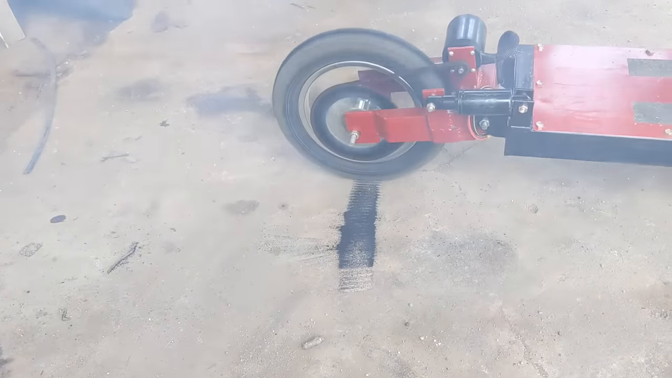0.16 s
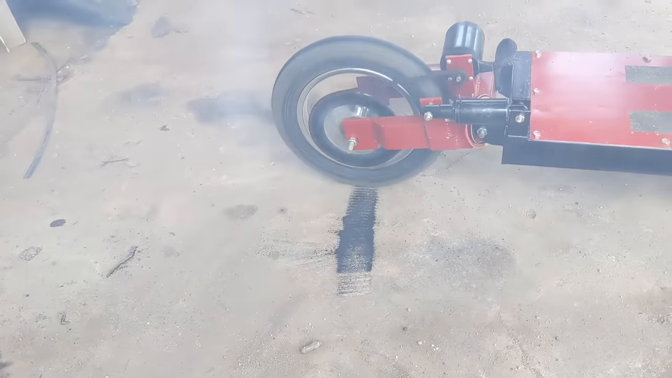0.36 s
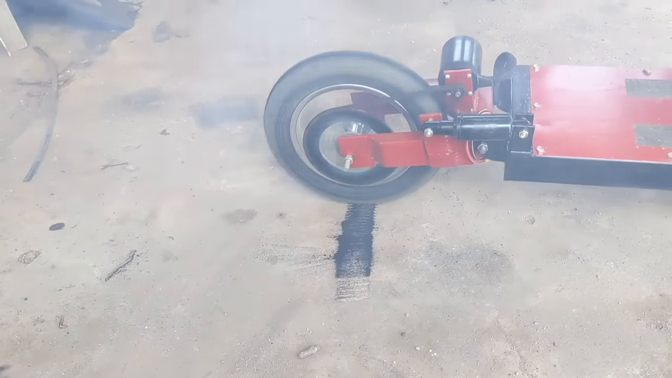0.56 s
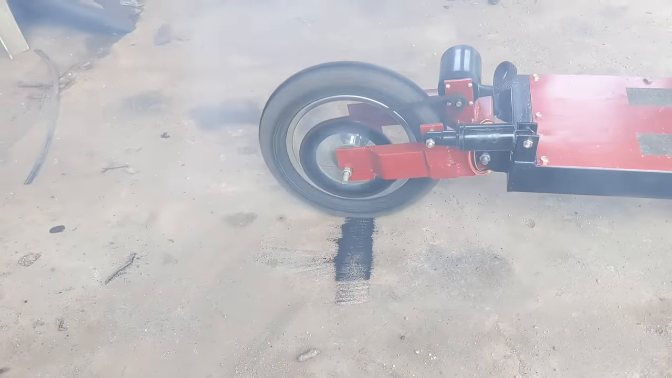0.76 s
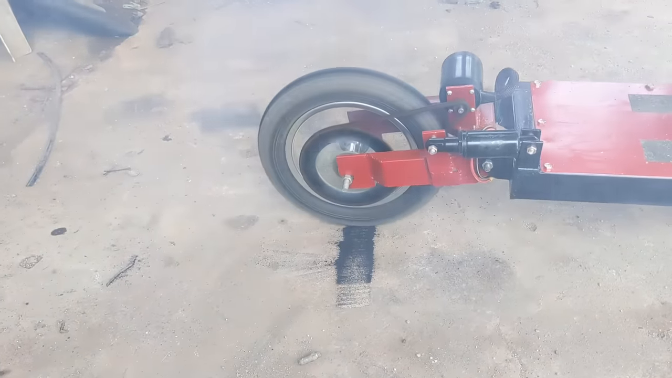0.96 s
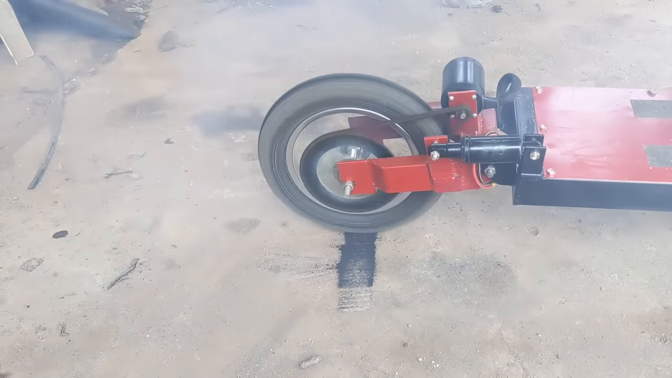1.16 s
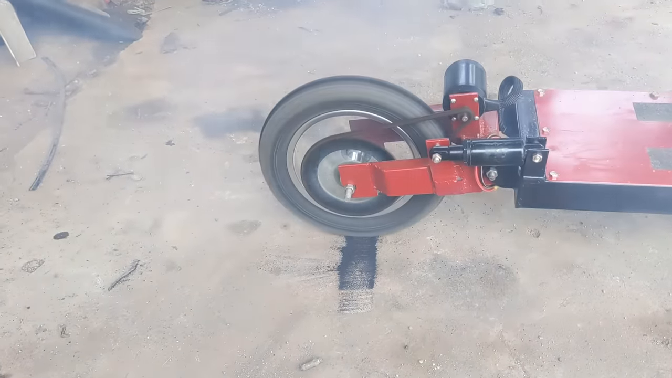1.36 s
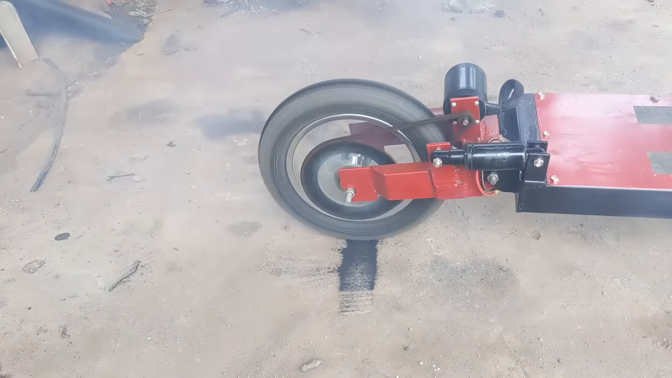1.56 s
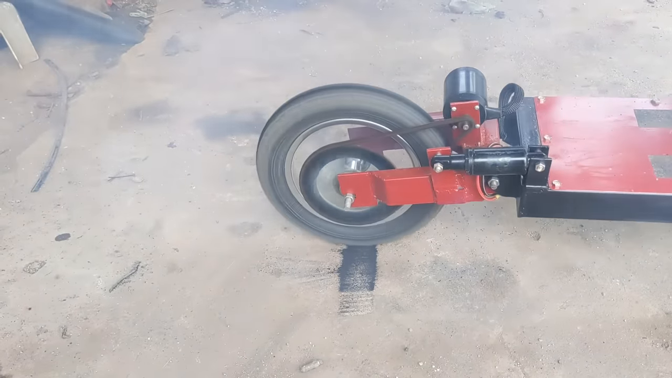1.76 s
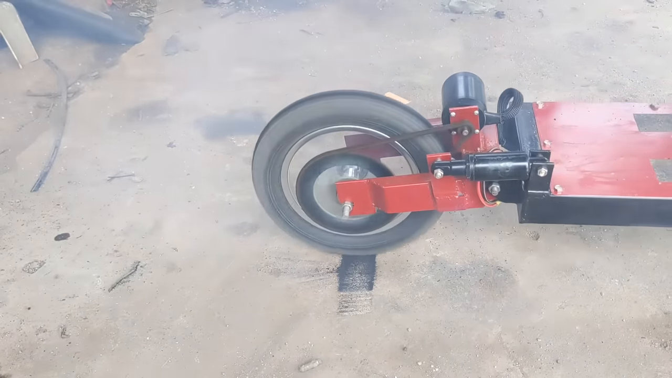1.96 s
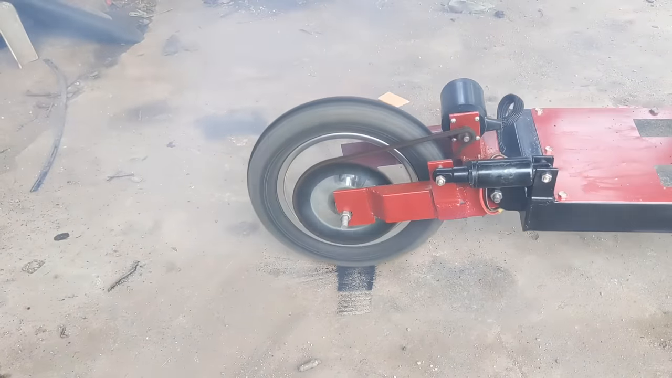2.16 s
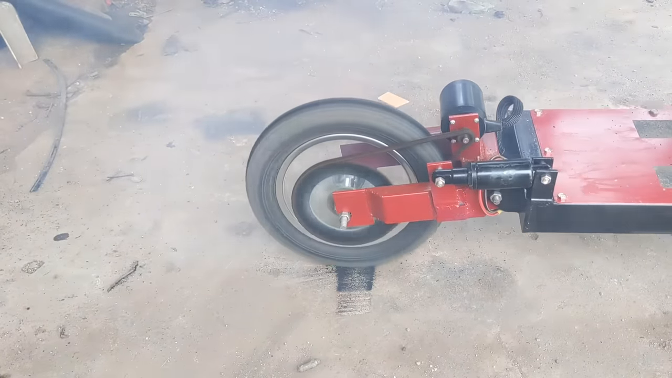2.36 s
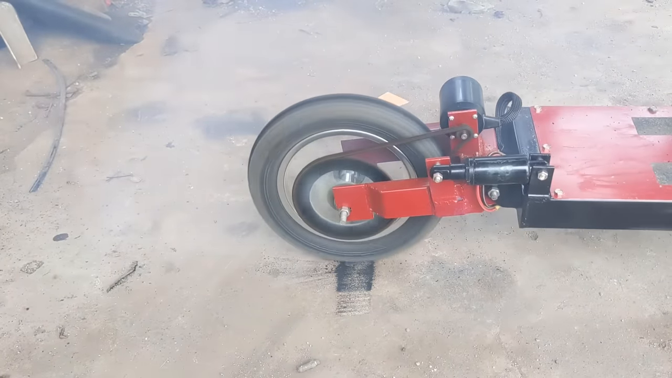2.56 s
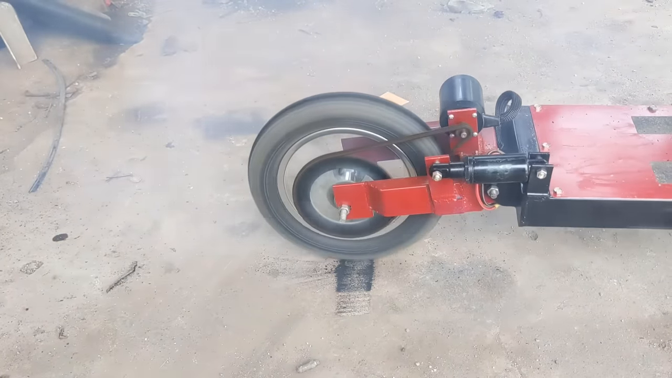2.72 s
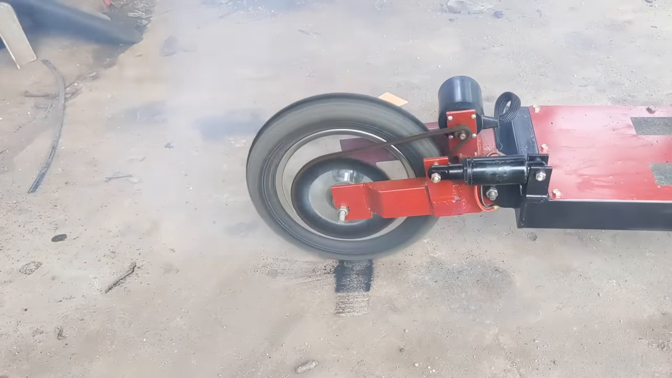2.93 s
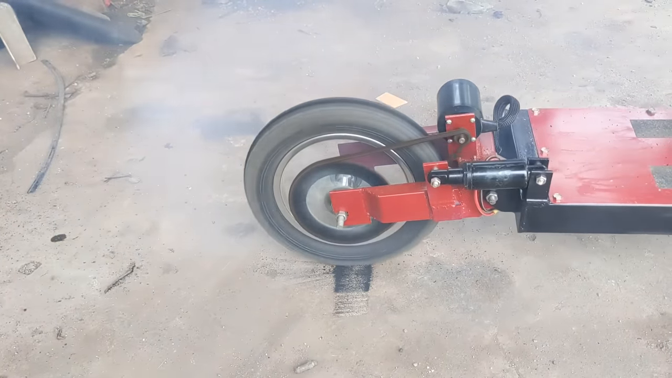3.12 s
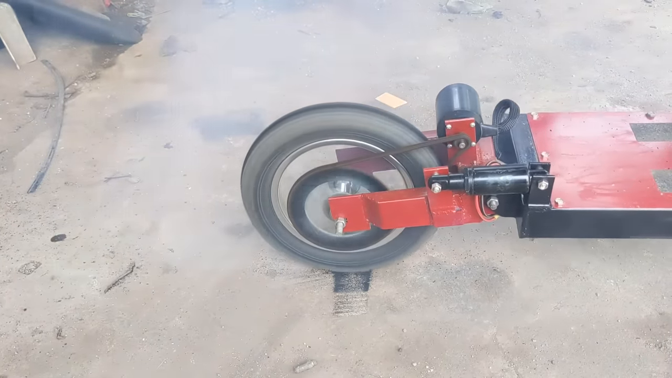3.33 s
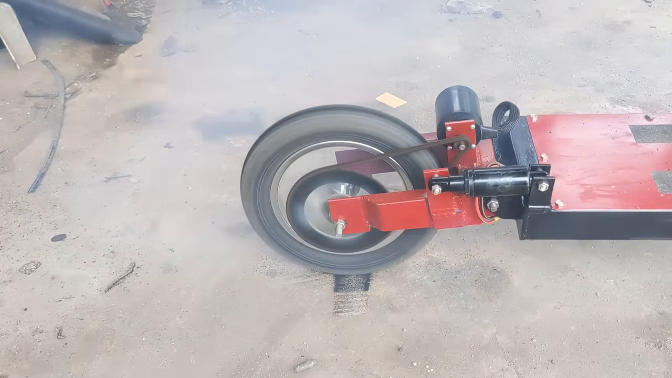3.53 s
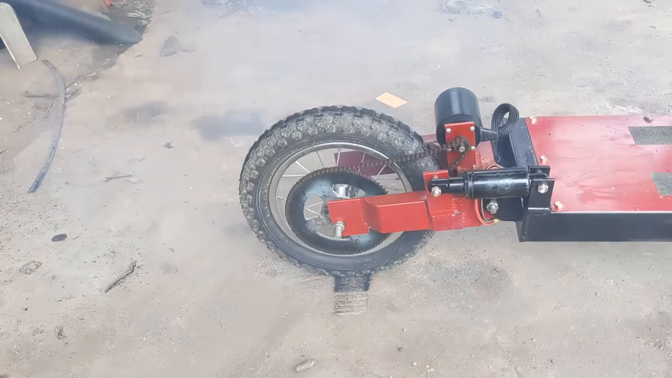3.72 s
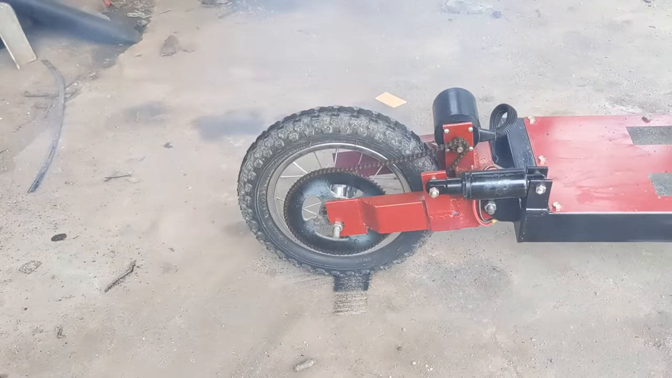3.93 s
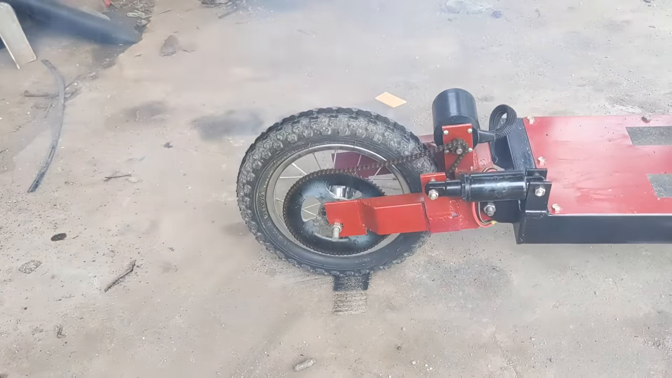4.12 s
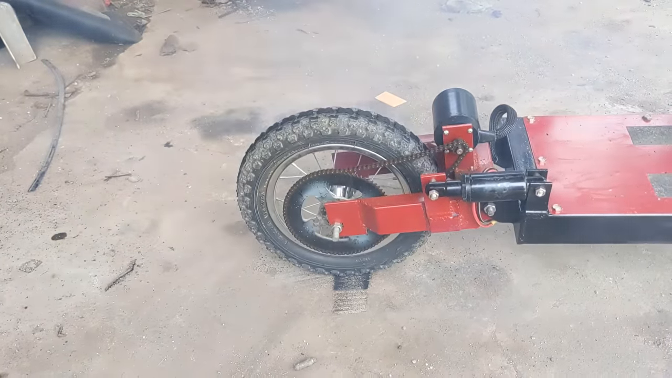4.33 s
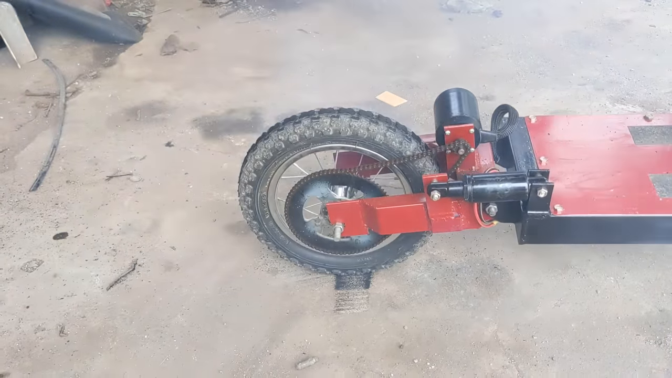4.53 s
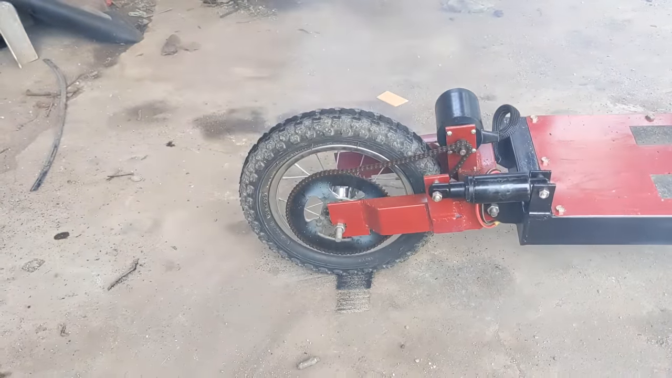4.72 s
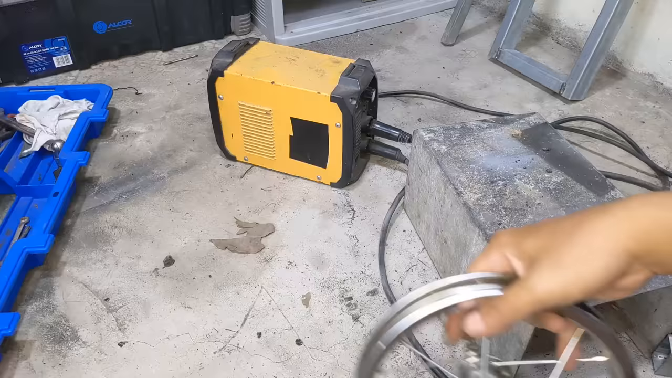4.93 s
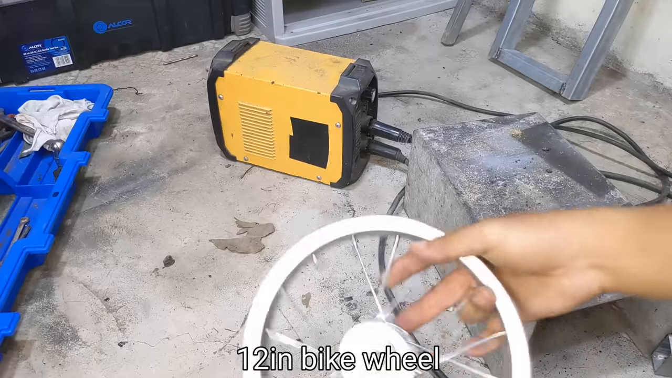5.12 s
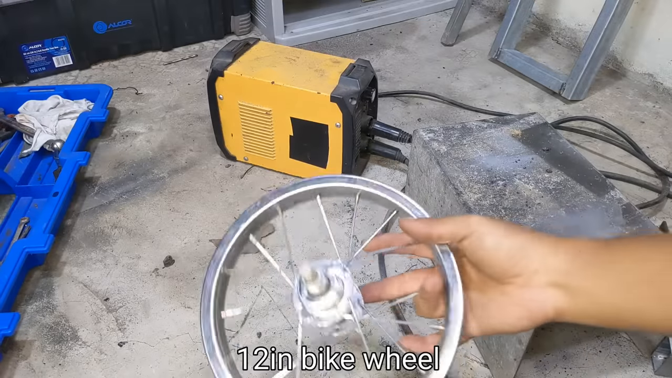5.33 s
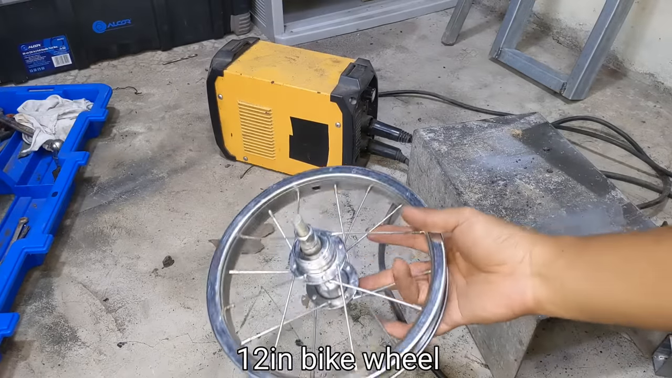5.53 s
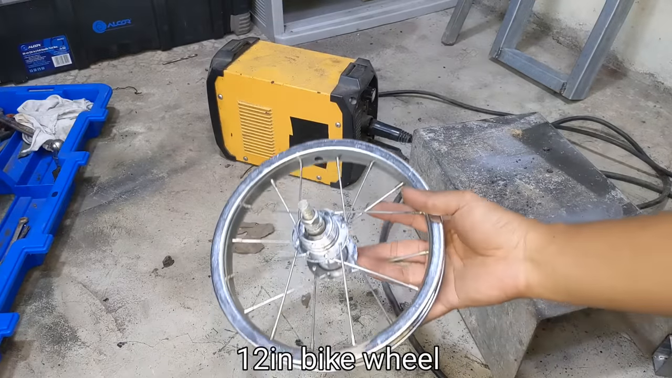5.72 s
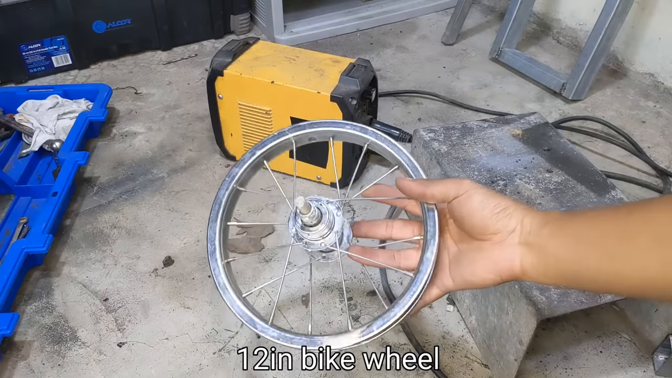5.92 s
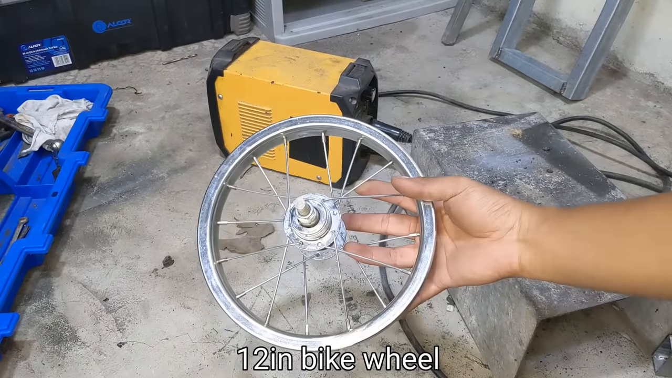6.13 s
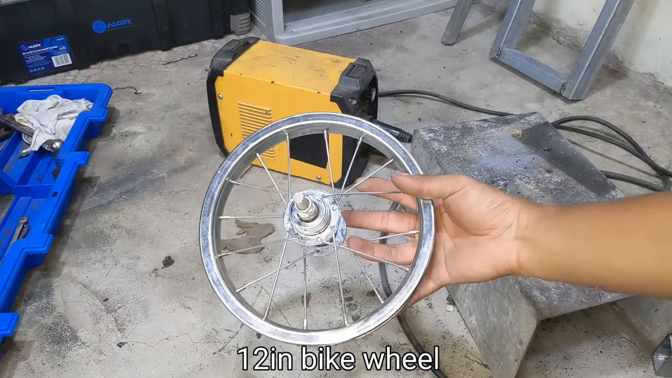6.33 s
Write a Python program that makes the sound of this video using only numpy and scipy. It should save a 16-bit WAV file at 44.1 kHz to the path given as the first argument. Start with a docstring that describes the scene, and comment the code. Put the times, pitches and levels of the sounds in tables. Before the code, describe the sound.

Belt-driven electric wheel whines shrilly while its tyre scrubs hissing on concrete, stalls with a quick rattle, then cuts to a quiet humming workshop.

```python
"""An electric scooter does a burnout on concrete: belt teeth whine, tread blocks slap and scrub the ground.
A yard rumbles, hums and hisses around it, with one low swell early on, perhaps wind or handling.
At 3.525 s the throttle is let go and the wheel stalls in 0.385 s, rattling; then faint chirps are heard.
After 31 ms of silence comes a workshop: fan hum, air, clicks of a hand-turned wheel, chirps, another swell.
Whines are harmonics locked to the wheel, rubbing and air are coloured noise, hums are unsteady sines."""
import sys
import numpy as np
from scipy import signal
from scipy.fft import rfft, irfft, next_fast_len
from scipy.io import wavfile
from scipy.ndimage import map_coordinates

SR = 44100
rng = np.random.default_rng(int(sys.argv[2]) if len(sys.argv) > 2 else 0)


def dump(signal):
    """Clip the signal to [-1, 1] and save it as 16-bit WAV at the path in sys.argv[1]."""
    limited = np.clip(np.atleast_2d(signal).T, -1, 1)
    pcm = np.round(limited * 32767).astype(np.int16)
    wavfile.write(sys.argv[1], SR, pcm)


N = 285768
T = np.arange(N) / SR


def amp(db):
    """Decibels to gain."""
    return 10 ** (np.asarray(db) / 20)


def unit(x):
    """Scale to rms 1."""
    return x / np.sqrt(np.mean(x ** 2) + 1e-20)


def along(points, hz):
    """Interpolate (Hz, value) points on a log frequency axis."""
    f, v = np.transpose(points)
    return np.interp(np.log(hz + 1), np.log(f + 1), v)


def curves(rows):
    """One value per sample for each column after the time."""
    s, *cols = np.transpose(rows)
    return [np.interp(T, s, c) for c in cols]


def wobble(rate):
    """A smooth random curve of rms 1, with rate knots a second."""
    knots = rng.standard_normal(int(N * rate / SR) + 4)
    return unit(map_coordinates(knots, [T * rate]))


def bump(x, centre, width):
    """A smooth rise and fall around a centre."""
    return np.exp(-((x - centre) / width) ** 2)


def fades(speed, knee, power):
    """Full strength above the knee, dying away as the wheel slows below it."""
    return np.clip(speed / knee, 0, 1) ** power


def filtered(x, response):
    """x times a response of frequency."""
    m = next_fast_len(N + SR // 4)
    return irfft(rfft(x, m) * response(np.fft.rfftfreq(m, 1 / SR)), m)[..., :N]


# How alike noise is at the two microphones. Each row: frequency in Hz, left-right likeness (1 is identical).
LIKENESS = [(60, 0.95), (150, 0.97), (380, 0.95), (900, 0.5), (2400, 0.32), (15000, 0.055)]


def rush(spectrum):
    """Stereo noise of rms 1, alike in the bass and nearly unrelated in the high treble."""
    def colour(hz):
        turn = np.arccos(np.clip(along(LIKENESS, hz), -1, 1)) / 2
        return amp(along(spectrum, hz)) * [np.cos(turn), np.sin(turn)]
    mid, side = filtered(rng.standard_normal((2, N)), colour)
    return unit(np.array([mid + side, mid - side]))


def panned(x, tilt):
    """Each frequency leans to its own side by its left minus right dB."""
    return filtered(x, lambda hz: amp(np.outer([.5, -.5], along(tilt, hz))))


def left_later(x, lag_ms):
    """An off-centre source reaches one microphone later: the left one for a positive lag."""
    return filtered(x, lambda hz: np.exp(np.outer([-1j, 1j], np.pi * hz * lag_ms / 1000)))


# How fast floor and walls die away around the wheel. Each row: frequency in Hz, 60 dB decay time in s.
WALL_DECAY = [(200, 0.049), (2000, 0.29), (8000, 0.096), (15000, 0.012)]


def room(x, wet_db):
    """Direct sound plus a short answer of floor and walls, different at each microphone."""
    hz, t, z = signal.stft(rng.standard_normal((2, SR // 3)), SR, nperseg=256)
    decay = amp(-60 * t / along(WALL_DECAY, hz)[:, None])
    tail = signal.istft(z * decay, SR, nperseg=256)[1]
    wet = signal.fftconvolve(x, tail / np.linalg.norm(tail[0]), axes=1)[:, :N]
    return (x + amp(wet_db) * wet) / np.hypot(1, amp(wet_db))


def hum(lines):
    """Slightly unsteady tones from rows of frequency in Hz and rms level in dB."""
    out = np.zeros(N)
    for hz, db in lines:
        level = amp(db + 1.5 * wobble(6))
        out += level * np.sin(2 * np.pi * hz * T + .45 * wobble(7))
    return np.sqrt(2) * out


BELT_TEETH, MOTOR_TEETH, TREAD_BLOCKS = 36, 9, 39
# Throttle let go (s), time to standstill (s), power of time by which speed is lost.
RELEASE_S, STALL_S, STALL_POWER = 3.525, .385, 1.68
# Drive speed under throttle. Each row: time in seconds, belt teeth meshing per second.
DRIVE_SPEED = [(0, 906), (.19, 891), (.33, 889), (.45, 871), (.62, 838), (.74, 819), (.88, 804),
               (1.13, 815), (1.27, 815), (1.43, 828), (1.64, 854), (1.78, 867), (1.9, 871), (2.04, 864),
               (2.16, 842), (2.28, 829), (2.45, 823), (2.6, 828), (2.83, 823), (3.12, 838), (3.4, 845),
               (3.52, 843)]


def wheel():
    """The throttle drives the wheel until release, then friction stalls it: speed share, turns a second, turns."""
    speed = 1 - np.clip((T - RELEASE_S) / STALL_S, 0, 1) ** STALL_POWER
    turn_hz = speed * curves(DRIVE_SPEED)[0] / BELT_TEETH
    return speed, turn_hz, np.cumsum(turn_hz) / SR


def each_turn(turns, count):
    """Unevenness around the wheel, the same on every turn: count lobes, the broad ones strongest."""
    lobes = np.arange(-count, count + 1)
    sizes = np.exp(2j * np.pi * rng.random(len(lobes))) * (lobes != 0) / np.sqrt(1 + np.abs(lobes))
    angle = np.linspace(0, 1, 512)
    shape = np.exp(2j * np.pi * np.outer(angle, lobes)) @ sizes / np.linalg.norm(sizes)
    return np.interp(turns % 1, angle, shape)


def whine(turns, turn_hz, count, partials, body, uneven, slip, rough, flutter_db):
    """Harmonics of count uneven, slipping impacts a turn, each sweeping the body's resonances."""
    speed = np.clip(turn_hz / np.median(turn_hz[:3 * SR]), .01, 1)
    # slip shifts the timing, so each higher harmonic is more blurred; the stalling wheel judders more
    judder = 1 + 4 * np.clip(1 - speed, 0, 1) ** .7 * (T > RELEASE_S)
    drift = 2.5 * wobble(8) + 1.2 * wobble(22) + wobble(80) + .6 * wobble(260)
    phase = 2 * np.pi * count * turns + slip * judder * drift
    grit = np.array([wobble(170) + 1j * wobble(170) for ear in range(2)])
    flutter = amp(flutter_db * unit(wobble(12) + wobble(4.04)))
    grid = np.arange(0, SR / 2, 5)
    body_db = np.zeros(len(grid))
    for hz, width, up in body:
        body_db += up / (1 + ((grid - hz) / width) ** 2)
    out = np.zeros((2, N))
    for k, db in partials:
        lift = np.interp(k * count * turn_hz, grid, body_db)
        mesh_multiple = k * count / BELT_TEETH
        # slow impacts are soft: the upper harmonics die first
        softness = speed ** (1.6 * max(mesh_multiple - 3, 0))
        # short waves feel the unevenness most, and differ most between the microphones
        short = min(mesh_multiple / 3, 1)
        strength = 1 + short * uneven * each_turn(turns, count=6)
        strength = strength + rough * mesh_multiple * np.roll(grit, rng.integers(N), axis=1)
        apart = np.array([[.5], [-.5]]) * rng.choice([-1, 1]) * short * np.pi / 2
        ears = np.exp(1j * (rng.uniform(0, 2 * np.pi) + apart))
        tone = (strength * ears * np.exp(1j * k * phase)).real
        out += amp(db + lift) * softness * unit(np.roll(flutter, rng.integers(N)) * tone)
    return out


# Resonances and nulls of deck, tyre and rim, which also shape belt and tread.
# Each row: frequency in Hz, half width in Hz, lift in dB.
BODY_RESONANCES = [(763, 59, 5), (1700, 120, 13), (2170, 120, -5.5), (2720, 130, 4), (2820, 78, 3.5),
                   (3890, 133, -10), (6924, 156, 10.5), (9280, 110, 3.5), (10260, 480, -11),
                   (12570, 220, -0.5)]
# Motor whine. Each row: multiple of the shaft rate, relative level in dB.
MOTOR_PARTIALS = [(7, -54.5), (8, -49.5), (10, -47), (16, -70)]
# Gain of the motor whine. Each row: time in seconds, gain in dB.
MOTOR_GAIN = [(0, -8), (1.1, -2), (1.7, 4), (2.3, 0.5), (3.5, -1.5)]


def motor(turns, turn_hz):
    """The motor shaft turns four times per wheel turn and whines at multiples of its rate."""
    tone = whine(turns, turn_hz, BELT_TEETH / MOTOR_TEETH, MOTOR_PARTIALS, BODY_RESONANCES,
                 uneven=.45, slip=.01, rough=.1, flutter_db=2.2)
    return amp(curves(MOTOR_GAIN)[0]) * tone


BELT_GAIN_DB = 1.5
# Upper belt whine. Each row: multiple of the mesh rate, relative level in dB.
BELT_PARTIALS = [(3, -40), (4, -35.5), (5, -32), (6, -35.5), (7, -36.5), (8, -37), (9, -41), (10, -41)]
# The pulley runs out of true, which splits the belt's third harmonic.
# Each row: multiple of the wheel rate, relative level in dB.
RUNOUT_LINES = [(106, -39.5), (107, -35.5), (109, -34)]


def belt(turns, turn_hz):
    """Belt teeth mesh with the pulley, whose runout puts extra lines beside the third harmonic."""
    teeth = whine(turns, turn_hz, BELT_TEETH, BELT_PARTIALS, BODY_RESONANCES,
                  uneven=.7, slip=.08, rough=.09, flutter_db=1.5)
    runout = whine(turns, turn_hz, 1, RUNOUT_LINES, BODY_RESONANCES,
                   uneven=.7, slip=.0015, rough=.06, flutter_db=2)
    return amp(BELT_GAIN_DB) * (teeth + runout)


SLAP_GAIN_DB = -1
# Upper tread whine; two staggered rows of blocks favour even multiples.
# Each row: multiple of the block rate, relative level in dB.
TREAD_PARTIALS = [(3, -38), (4, -31), (6, -31), (8, -26.5), (9, -28), (10, -22.5), (11, -39), (12, -31.5),
                  (14, -27)]


def tread(turns, turn_hz):
    """Tread blocks slap the concrete one after another, fast enough to whine."""
    tone = whine(turns, turn_hz, TREAD_BLOCKS, TREAD_PARTIALS, BODY_RESONANCES,
                 uneven=.6, slip=.05, rough=.06, flutter_db=1.5)
    return amp(SLAP_GAIN_DB) * tone


# The three leading tones, each flanked by lines whole turns apart: belt mesh, belt octave, tread octave.
# Each row: multiple of the wheel rate, relative level in dB.
MESH_TONE = [(35, -19), (36, 0), (37, -18)]
BELT_OCTAVE = [(70, -10), (71, -1.5), (72, 0), (73, -12)]
TREAD_OCTAVE = [(75, -15), (76, -13), (77, -13), (78, 0), (79, -12.5), (80, -16), (82, -20)]
# Relative levels of the leading tones at the left and right microphone. Each row: time in seconds,
# mesh left and right in dB, belt octave left and right in dB, tread octave left and right in dB.
LEADING_LEVELS = [(0.0, -41.5, -38.5, -27.5, -26.5, -33.0, -27.5),
                  (0.22, -32.0, -39.5, -31.5, -39.5, -23.5, -21.5),
                  (0.47, -30.0, -29.0, -37.5, -42.5, -23.0, -23.5),
                  (0.75, -39.5, -43.0, -37.5, -40.5, -24.5, -35.5),
                  (0.92, -45.0, -45.5, -41.0, -44.5, -28.0, -30.0),
                  (1.15, -32.5, -37.0, -40.5, -39.5, -19.5, -31.5),
                  (1.47, -40.5, -38.0, -26.0, -35.0, -23.5, -31.0),
                  (1.7, -30.5, -31.0, -32.5, -43.5, -25.5, -27.0),
                  (1.92, -27.5, -30.5, -33.5, -35.0, -20.5, -19.5),
                  (2.15, -39.5, -36.0, -27.5, -40.0, -27.0, -28.5),
                  (2.45, -33.5, -43.0, -21.5, -34.0, -31.0, -26.0),
                  (2.8, -30.5, -41.5, -26.5, -30.0, -29.0, -32.0),
                  (3.03, -42.5, -43.5, -25.0, -36.5, -26.5, -26.0),
                  (3.25, -35.5, -30.5, -27.0, -35.5, -23.0, -28.5),
                  (3.55, -35.0, -39.0, -23.0, -31.0, -22.0, -29.0),
                  (3.7, -45.0, -48.5, -37.0, -41.0, -35.0, -36.5),
                  (3.8, -42.0, -47.5, -48.5, -47.5, -46.0, -44.0)]
LEADING_GAIN_DB = -0.8


def leading_tones(turns, turn_hz):
    """The belt's mesh tone and the octaves of belt and tread: beating lines that trade places in loudness."""
    levels_db = np.reshape(curves(LEADING_LEVELS), (-1, 2, N))
    out = np.zeros((2, N))
    for lines, db in zip([MESH_TONE, BELT_OCTAVE, TREAD_OCTAVE], levels_db):
        tone = whine(turns, turn_hz, 1, lines, [], uneven=.15, slip=.0012, rough=.06, flutter_db=1)
        out += amp(db + LEADING_GAIN_DB) * tone / tone[:, T < RELEASE_S].std()
    return out


# Rubber hissing on concrete, used by both rubbing functions below.
# Each row: frequency in Hz, relative density in dB per Hz.
RUBBER_HISS = [(3900, -40), (4600, -7), (5400, -4.5), (6200, 2.5), (7000, 3.5), (7800, 2), (8900, 3.5),
               (10100, -6.5), (11100, -6.5), (11700, -3), (12500, 2.5), (13800, -4.5), (15500, -8.5),
               (16300, -27)]
WEAR_SPREAD_DB, WEAR_CREEP_TURNS = 4, .0008


def worn_tread(turns, count):
    """The worn pattern rubs the same on each turn: a dense comb of count uneven partials gliding with the wheel."""
    spread = np.clip(rng.standard_normal((2, count)), -2, 2)
    sizes = amp(WEAR_SPREAD_DB * spread) * np.exp(2j * np.pi * rng.random((2, count)))
    one_turn = irfft(sizes, 16384)
    angle = np.linspace(0, 1, one_turn.shape[1])
    contact = (turns + WEAR_CREEP_TURNS * wobble(9)) % 1
    comb = np.array([np.interp(contact, angle, ear) for ear in one_turn])
    return unit(filtered(comb, lambda hz: amp(along(RUBBER_HISS, hz))))


SCRUB_DB, CARCASS_DB = -17, -27
WEAR_DB = -7  # worn pattern relative to the plain hiss
TREBLE_HZ, TREBLE_POWER = 9500, 1.24  # corner of the treble, power of speed by which it fades
# Rasp of the tyre carcass. Each row: frequency in Hz, relative density in dB per Hz.
CARCASS_RASP = [(200, -8.5), (450, -13.5), (620, 1.5), (900, 4.5), (1250, 8), (1480, 3.5), (1750, 16),
                (2130, 1.5), (2600, 12), (3050, 7), (3500, -7), (3850, -32), (4500, -16), (6000, -40.5)]


def scrub(turns, speed):
    """Blocks tear at the concrete, biting harder on part of each turn; slower rubbing is duller."""
    bite_db = 1.2 * np.cos(4 * np.pi * TREAD_BLOCKS * turns)  # two staggered rows: twice the block rate
    bite_db += 0.68 * each_turn(turns, count=4).real + 1.3 * wobble(400) + .75 * wobble(9)
    hiss = rush(RUBBER_HISS) + amp(WEAR_DB) * worn_tread(turns, count=680)
    treble = filtered(hiss, lambda hz: 1 - 1 / (1 + (hz / TREBLE_HZ) ** 10))
    hiss = hiss - treble * (1 - fades(speed, 1.0, TREBLE_POWER))
    return unit(amp(bite_db)) * (amp(SCRUB_DB) * hiss + amp(CARCASS_DB) * rush(CARCASS_RASP))


# Usual level, lift, centre and half width of one swell in the drumming.
DRUM_DB, DRUM_LIFT_DB, DRUM_PEAK_S, DRUM_WIDTH_S = -44, 11, 1.9, 0.51
# Drumming of the tyre carcass. Each row: frequency in Hz, relative density in dB per Hz.
CARCASS_DRUM = [(40, -44), (120, -9), (220, -0.5), (330, -3), (480, -2.5), (700, -16.5), (2000, -47),
                (5000, -92)]


def drumming():
    """The tyre carcass drums as low noise, harder once in mid-burnout."""
    drum_db = DRUM_DB + DRUM_LIFT_DB * bump(T, DRUM_PEAK_S, DRUM_WIDTH_S)
    return amp(drum_db) * rush(CARCASS_DRUM)


# Below a share of full speed (knee) each sound fades as a power of the speed.
WHINE_KNEE, WHINE_POWER, SCRUB_KNEE, SCRUB_POWER = 0.67, 2, 0.59, 1.25
# Where the wheel's sound lies between the microphones. Each row: frequency in Hz, left minus right in dB.
WHEEL_TILT = [(300, 2.5), (1300, 0), (1700, 3.5), (2200, -1), (5200, 2), (5900, -5.5), (8000, -3),
              (9200, -2), (9900, -2), (10800, 13), (12300, 1.5), (15000, 10)]


def scooter():
    """One wheel speed drives every whine, the rubbing and the stall rattle; the leading tones stay dry."""
    speed, turn_hz, turns = wheel()
    tones = motor(turns, turn_hz) + belt(turns, turn_hz) + tread(turns, turn_hz)
    tones = fades(speed, WHINE_KNEE, WHINE_POWER) * tones
    rubbing = fades(speed, SCRUB_KNEE, SCRUB_POWER) * (scrub(turns, speed) + drumming())
    lead = fades(speed, .3, 1) * leading_tones(turns, turn_hz)
    return panned(room(tones + rubbing + stall_rattle(speed), wet_db=-9), WHEEL_TILT) + lead


# Far rumble of the yard. Each row: frequency in Hz, relative density in dB per Hz.
FAR_RUMBLE = [(15, -71), (25, -41.5), (59, -0.5), (127, 1.5), (206, 0.5), (236, -0.5), (321, 0.5),
              (452, -10), (605, -12), (648, -13), (867, -14), (1500, -22), (1950, -67), (3300, -120)]
# Its loudness at the microphones. Each row: time in seconds, level in dB.
FAR_RUMBLE_LEVEL = [(0, -40), (3.2, -35.5), (3.9, -34.5), (4.95, -34.5)]
# Faint hum in the yard. Each row: frequency in Hz, level in dB.
YARD_HUM_LINES = [(131, -49), (236, -47.5), (320, -47.5), (427, -56)]
# Thin hiss of the yard. Each row: frequency in Hz, relative density in dB per Hz.
YARD_HISS = [(500, -34), (1200, -2.5), (2600, 1), (3100, 1), (3600, -5.5), (4300, -6), (5400, -9),
             (6700, -5), (8000, -7.5), (9700, -20.5), (12500, -26), (15000, -39)]
# Where that hiss lies. Each row: frequency in Hz, left minus right in dB.
YARD_HISS_TILT = [(1200, 2.5), (2600, -3.5), (4500, 0.5), (6800, -9), (9000, -2), (11000, 6)]
YARD_HISS_DB = -46.5


def yard():
    """Far rumble and a faint hum, earlier and louder at the left microphone, under a thin hiss."""
    far = amp(curves(FAR_RUMBLE_LEVEL)[0]) * rush(FAR_RUMBLE) + hum(YARD_HUM_LINES)
    air = amp(YARD_HISS_DB + 0.57 * wobble(5.7)) * rush(YARD_HISS)
    return left_later(far, lag_ms=-0.21) * amp([[.6], [-.6]]) + panned(air, YARD_HISS_TILT)


# Low swells of wind or handling, one in each place.
# Each row: centre in seconds, half length in seconds, peak level in dB.
LOW_SWELLS = [(.35, 0.54, -46), (6.242, 0.082, -34)]
# Their colour. Each row: frequency in Hz, relative density in dB per Hz.
LOW_SWELL_COLOUR = [(20, -30), (45, 0), (60, 1.5), (110, -29), (300, -82)]


def low_swells():
    """A low bass swell, perhaps wind or handling, comes twice, as bass noise under smooth bumps."""
    level = sum(amp(db) * bump(T, s, length) for s, length, db in LOW_SWELLS)
    return level * rush(LOW_SWELL_COLOUR)


# Level, share of full speed at which the rattle peaks, and spread of speed around that.
JUDDER_DB, JUDDER_SPEED, JUDDER_SPREAD = -30, 0.42, 0.15
# Rattle of rim and deck. Each row: frequency in Hz, relative density in dB per Hz.
JUDDER_COLOUR = [(600, -31), (790, 7), (950, -21), (1450, -19), (1630, -8), (1900, -22), (2200, -20),
                 (2600, -16), (2820, 4), (3100, -9), (3700, -9), (4400, -9), (5500, -15), (8000, -38)]


def stall_rattle(speed):
    """The stalling tyre grabs and rattles rim and deck, most at one slow speed."""
    level = amp(JUDDER_DB) * bump(speed, JUDDER_SPEED, JUDDER_SPREAD)
    return level * (speed > 0) * rush(JUDDER_COLOUR)


CHIRP_BLUR_HZ = 267.5
# Faint chirps, perhaps a far bird. Each row: centre in seconds, half length in seconds,
# frequency in Hz, level in dB.
FAINT_CHIRPS = [(4.07, 0.011, 3120, -53), (4.248, 0.02, 3150, -48), (4.345, .012, 3130, -46),
                (4.518, 0.023, 2960, -48), (4.7, .01, 3160, -46), (4.784, 0.013, 3150, -38),
                (4.83, .02, 3000, -50), (5.023, 0.011, 3200, -50.5), (5.9, .03, 2470, -51)]


def chirps():
    """Short faint tones, blurred by random turns of phase and level that differ at each microphone."""
    blur = np.array([wobble(CHIRP_BLUR_HZ) + 1j * wobble(CHIRP_BLUR_HZ) for ear in range(2)])
    calls = np.zeros(N, complex)
    for s, length, hz, db in FAINT_CHIRPS:
        calls += amp(db) * bump(T, s, length) * np.exp(2j * np.pi * hz * T)
    return (calls * blur).real


def taps(events, t60):
    """An envelope that jumps at each event and dies away by 60 dB in t60 seconds."""
    return sum(amp(db - 60 * np.abs(T - s) / t60) * (T >= s) for s, db in events)


# A spoked wheel turned in the hand. Each row: time in seconds, relative level in dB.
WHEEL_CLICKS = [(5.025, -40), (5.353, -42), (5.459, -41), (5.562, -42)]


def wheel_clicks():
    """Short bursts of mid-range noise from a spoked wheel turned in the hand."""
    colour = [(200, -10), (700, 0), (1500, -7), (3300, -18), (9000, -20), (15000, -37)]  # Hz, dB per Hz
    return taps(WHEEL_CLICKS, t60=.03) * rush(colour)


# Workshop levels. Each row: time in seconds, rumble level in dB, gain of the fan hum in dB.
SHOP_LEVELS = [(5, -44, 4), (5.95, -36, -2), (6.48, -41.5, -1)]
# Rumble of the workshop. Each row: frequency in Hz, relative density in dB per Hz.
SHOP_RUMBLE_COLOUR = [(13, -45), (22, -27), (43, -1), (65, 5), (81, -7), (124, 1), (140, -27), (180, -33),
                      (310, -120)]
# Air from the fan. Each row: frequency in Hz, relative density in dB per Hz.
FAN_AIR = [(59, -36), (100, -15.5), (159, -11), (188, -13), (233, -13), (378, -20), (429, -20), (508, -20),
           (682, -18.5), (774, -20.5), (917, -20), (2630, -35), (10800, -45.5), (15500, -60)]
# Tones of the fan. Each row: frequency in Hz, relative level in dB.
FAN_LINES = [(107.7, -46), (156.1, -36), (236.9, -44.5), (274.5, -71), (355.3, -54), (430.7, -48.5),
             (473.7, -51), (592.2, -55), (667.5, -50.5), (705.2, -52.5)]
FAN_AIR_DB = -35.5


def workshop():
    """A machine's fan hums over air, rumble and clicks, all later but louder at the right microphone."""
    rumble_db, hum_db = curves(SHOP_LEVELS)
    air = amp(FAN_AIR_DB) * rush(FAN_AIR)
    rumble = amp(rumble_db) * rush(SHOP_RUMBLE_COLOUR)
    fan = amp(hum_db) * hum(FAN_LINES)
    return left_later(fan + air + rumble + wheel_clicks(), lag_ms=-0.32) * amp([[-1.1], [1.1]])


YARD_ENDS_S, SHOP_BEGINS_S = 4.969, 5.0


def scene():
    """The burnout in the yard, a moment of silence, then the workshop; swells and chirps come in both."""
    passing = low_swells() + chirps()
    outdoors = (scooter() + yard() + passing) * (T < YARD_ENDS_S)
    indoors = (workshop() + passing) * (T >= SHOP_BEGINS_S)
    return outdoors + indoors


TOP_HZ = 15700


def record(dry):
    """The camera's microphones keep almost nothing above a steep band limit."""
    return filtered(dry, lambda hz: 1 / (1 + (hz / TOP_HZ) ** 120))


dry = scene()
out = record(dry)
dump(out)
```